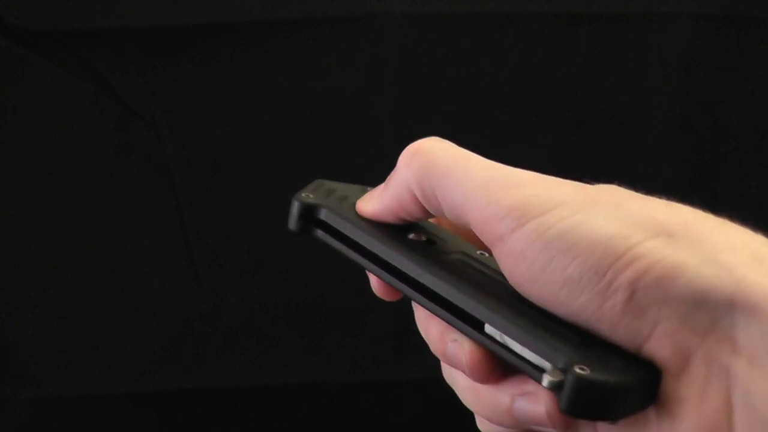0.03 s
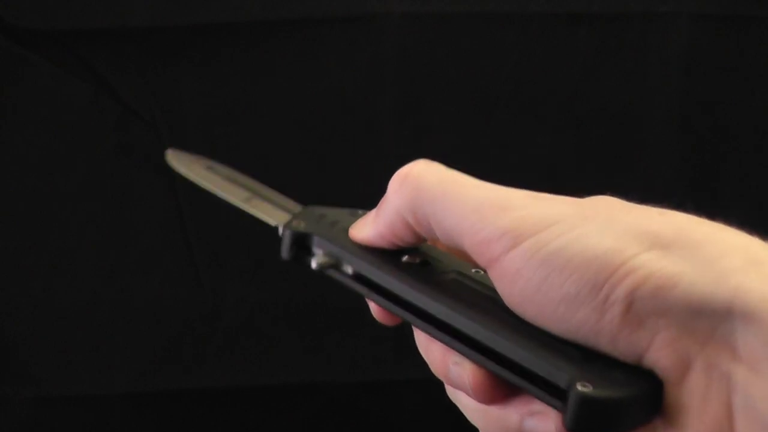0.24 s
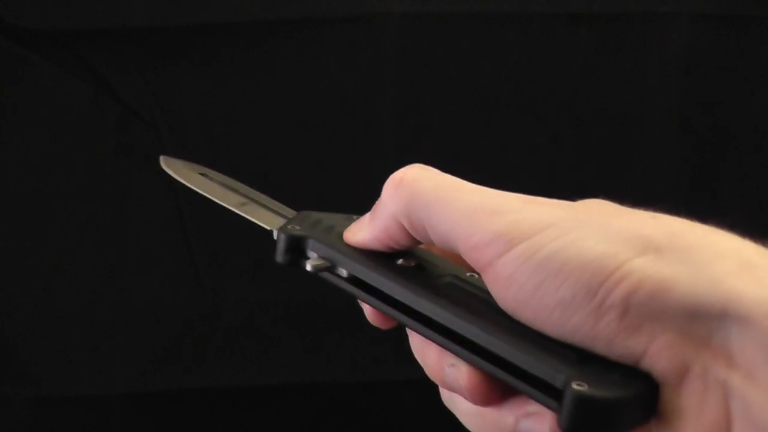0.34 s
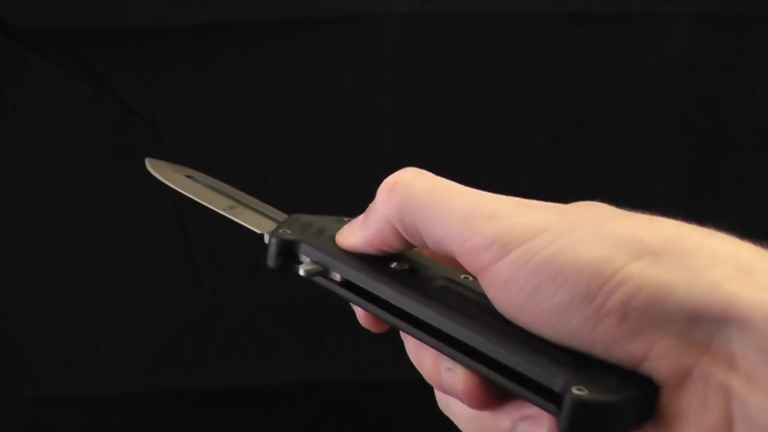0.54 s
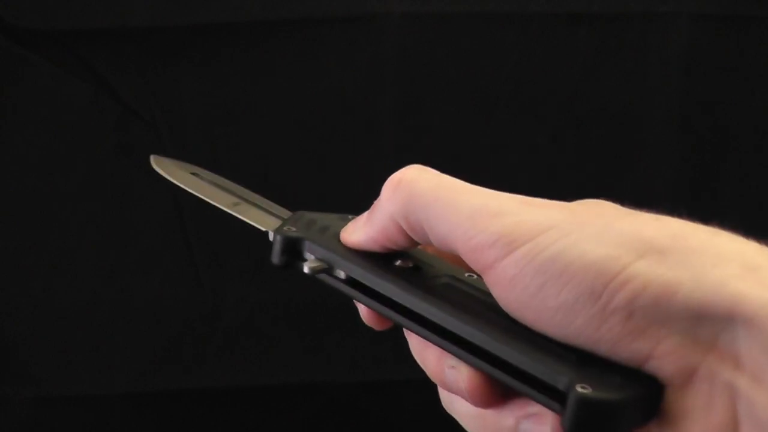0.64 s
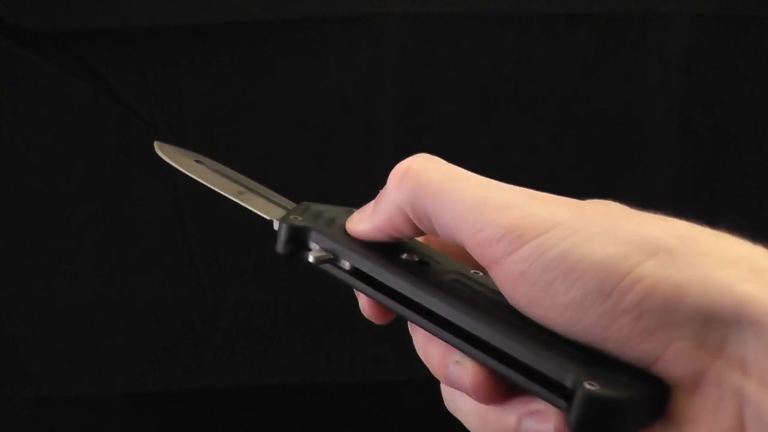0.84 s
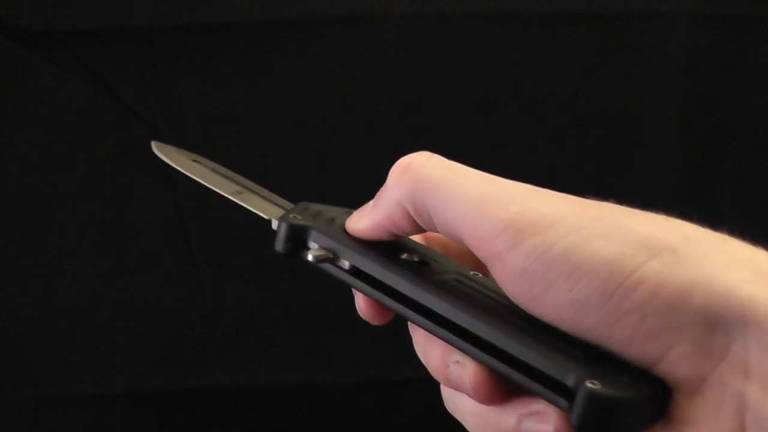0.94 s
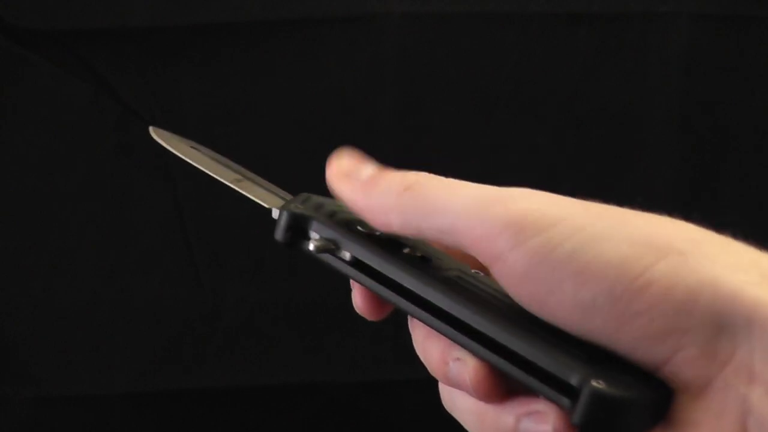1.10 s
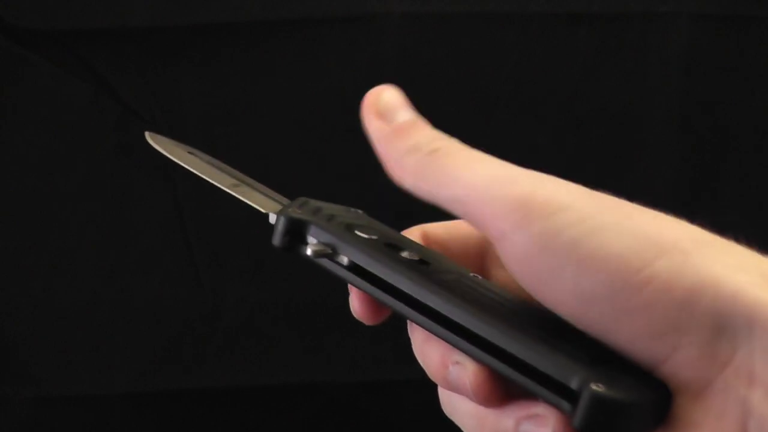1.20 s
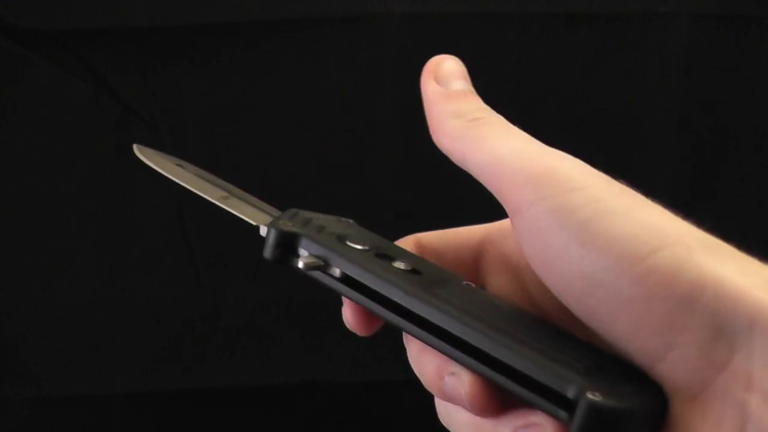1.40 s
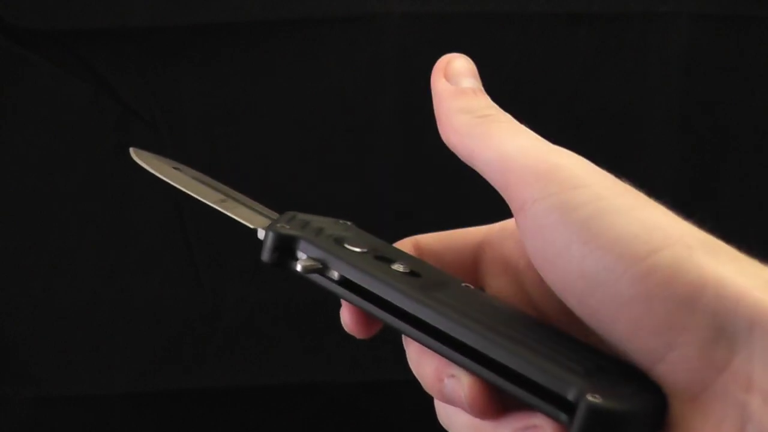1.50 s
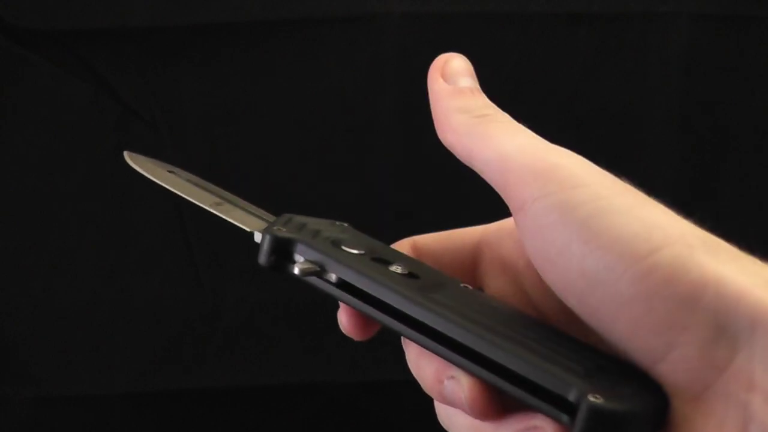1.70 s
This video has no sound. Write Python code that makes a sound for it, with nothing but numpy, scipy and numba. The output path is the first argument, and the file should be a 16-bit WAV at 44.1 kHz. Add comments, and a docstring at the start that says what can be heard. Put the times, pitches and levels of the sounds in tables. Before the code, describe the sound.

A spring-loaded knife blade snaps open with one sharp metallic clack and a brief ringing tail

```python
"""A spring-loaded knife fires close to a small two-port camera in a quiet, live room: the catch lets go,
the blade slides out and slams into its lock with a few bounces. Filtered noise bursts make the steel
chatter, decaying sines the blade's ring and the handle's thud, and decaying noise the room's answer.
The camera's gain control ducks and lets go; under it all lie room rumble, a wavering hum, microphone hiss,
the camera's faint ticking and small creaks of the grip."""
import sys
import numpy as np
from scipy import signal
from scipy.fft import rfft, irfft, next_fast_len
from scipy.io import wavfile
from scipy.ndimage import uniform_filter1d, map_coordinates
from numba import njit

SR = 44100
rng = np.random.default_rng(int(sys.argv[2]) if len(sys.argv) > 2 else 0)


def amplitude_ratio(level_db):
    """Convert a level in decibels to the matching linear amplitude (field) ratio."""
    exponent = np.asarray(level_db, float) / 20
    return 10 ** exponent


def to_wav(sig):
    """Store sig (one row per channel, or 1-D mono) as 16-bit WAV at the path in sys.argv[1].

    Samples outside -1..1 are clipped; the rate is SR.
    """
    pcm = np.clip(np.atleast_2d(sig), -1, 1) * 32767
    pcm = np.round(pcm).astype(np.int16)
    wavfile.write(sys.argv[1], SR, pcm.T)  # frames by channels


N = 77175  # samples, 1.75 s


def curve(rows):
    """(s, value) rows as one value per sample."""
    return np.interp(np.arange(N) / SR, *np.transpose(rows))


def along(points, hz):
    """(Hz, value) points interpolated on a log frequency axis."""
    point_hz, values = np.transpose(points)
    return np.interp(np.log(hz + 1), np.log(point_hz + 1), values)


def wobble(rate):
    """A smooth random curve with rate knots a second."""
    knots = rng.standard_normal(int(N * rate / SR) + 4)
    return map_coordinates(knots, [np.arange(N) * rate / SR])


def coloured(x, spectrum):
    """x through a causal, minimum-phase filter with the given (Hz, dB) shape and unit noise gain."""
    size = 2 * next_fast_len(N // 2 + 4096)
    shape = amplitude_ratio(along(spectrum, np.fft.rfftfreq(size, 1 / SR)))
    # folding the cepstrum onto positive time makes the filter causal
    cepstrum = irfft(np.log(shape + 1e-6), size)
    cepstrum[1:size // 2] *= 2
    cepstrum[size // 2 + 1:] = 0
    response = np.exp(rfft(cepstrum))
    noise_gain = np.sqrt(np.mean(abs(response) ** 2))
    return irfft(rfft(x, size) * response / noise_gain, size)[..., :N]


def widen(mid, other, side_share):
    """Left and right from a mid signal and an unrelated twin scaled by the (Hz, dB) side share."""
    side = irfft(rfft(other) * amplitude_ratio(along(side_share, np.fft.rfftfreq(N, 1 / SR))), N)
    return np.array([mid + side, mid - side])


def bursts(rows, t60):
    """Envelope of contacts: each jumps in, holds for its length, then dies."""
    t = np.arange(N) / SR
    return sum(amplitude_ratio(db - 60 * np.clip(t - start - hold, 0, 1) / t60) * (t >= start)
               for start, db, hold, *_ in rows)


def ringing(times, levels_db, modes):
    """Impulses at the given times ring a table of decaying sine modes."""
    blows = np.zeros(N)
    np.add.at(blows, (np.asarray(times) * SR).astype(int), amplitude_ratio(levels_db))
    t = np.arange(SR // 8) / SR
    ring = sum(amplitude_ratio(db - 60 * t / t60) * np.sin(2 * np.pi * hz * t) for hz, db, t60 in modes)
    return signal.fftconvolve(blows, ring)[:N]


# Room rumble and hiss, the part alike on both ports. Each row: frequency in Hz, relative density in dB per Hz.
AIR_MID_COLOUR = [(15, -76), (25, -42.5), (65, -5.5), (85, -6), (105, -14.5), (135, -14), (202, -9.5),
                  (232, -5), (266, -11.5), (445, -19.5), (496, -16), (669, -24.5), (726, -18), (1010, -35),
                  (1180, -26.5), (2090, -35.5), (3060, -32.5), (4480, -39), (6210, -32.5), (14400, -44),
                  (16500, -55.5)]
# The part opposed on the two ports. Each row: frequency in Hz, relative density in dB per Hz.
AIR_SIDE_COLOUR = [(15, -48), (25, -15), (114, 1), (410, -2), (809, -9), (1010, -20), (1150, -12.5),
                   (2270, -32.5), (3060, -29), (4600, -44.5), (5720, -32.5), (14400, -36.5), (16500, -45.5)]


def room_air():
    """Rumble and microphone hiss: two steady coloured noises whose levels drift slowly."""
    mid_db = -61.5 + 0.68 * wobble(4)
    side_db = -62 + 0.87 * wobble(4)
    mid = amplitude_ratio(mid_db) * coloured(rng.standard_normal(N), AIR_MID_COLOUR)
    side = amplitude_ratio(side_db) * coloured(rng.standard_normal(N), AIR_SIDE_COLOUR)
    return np.array([mid + side, mid - side])


# Hum tones. Each row: frequency in Hz, level in dB, waver of level in dB.
HUM_TONES = [(75, -66, 3), (139, -72, 2), (236.2, -71, 4), (721, -76, 0)]
# Swell of the lowest tone, used about its own mean. Each row: time in seconds, level in dB.
HUM_SWELL = [(0.5, -73), (0.802, -69), (0.812, -79), (1.042, -59.5), (1.75, -60.5)]


def hum():
    """Sines, most of them wavering in level and phase; the lowest also swells and sinks."""
    t = np.arange(N) / SR
    tones = []
    for hz, db, waver_db in HUM_TONES:
        level = amplitude_ratio(db + waver_db * wobble(9.8))
        phase_waver = .4 * waver_db * wobble(8)  # radians
        tones.append(level * np.sin(2 * np.pi * hz * t + phase_waver))
    swell_db = curve(HUM_SWELL)
    return amplitude_ratio(swell_db - swell_db.mean()) * tones[0] + sum(tones[1:])


# Ring of one tick. Each row: frequency in Hz, relative level in dB, t60 in seconds.
TICK_MODES = [(2600, -2, .028), (3080, 0, .028)]


def camera_ticks():
    """The camera's faint ticking: evenly spaced impulses of uneven strength ring two modes."""
    count, start_s, period_s = 104, .0015, .01668
    levels_db = -73 + 3 * rng.standard_normal(count)
    return ringing(start_s + period_s * np.arange(count), levels_db, TICK_MODES)


# Rubs of the grip. Each row: start in seconds, level in dB, length in seconds.
GRIP_RUBS = [(.016, -65, .003), (.085, -71, .004), (.75, -73, .02), (.775, -70, .01), (.808, -70, .015)]
# Their tone. Each row: frequency in Hz, relative density in dB per Hz.
CREAK_COLOUR = [(2000, -25), (4500, -8), (6000, 0), (8500, -3), (11000, -14), (14000, -25)]


def grip_creaks():
    """The grip rubs: short coloured noise bursts that die with a t60 of 0.05 s."""
    return coloured(bursts(GRIP_RUBS, .05) * rng.standard_normal(N), CREAK_COLOUR)


# Width of the knife heard close by. Each row: frequency in Hz, side over mid in dB.
NEAR_SIDE = [(1500, -9.5), (4000, -18.5), (8000, -15.5), (15000, -10)]


def close_noise(envelope, colour):
    """Steel noise close to the two ports: a shared part and an unrelated side part."""
    mid, twin = coloured(envelope * rng.standard_normal((2, N)), colour)
    return widen(mid, twin, NEAR_SIDE)


def chatter(contacts, colour):
    """Steel on steel: each contact is a rough noise burst with a short decay."""
    t60_s, rough_db, rough_rate = 0.0091, 4, 1500
    rough = amplitude_ratio(rough_db * wobble(rough_rate))
    return close_noise(rough * bursts(contacts, t60_s), colour)


# Handle modes. Each row: frequency in Hz, relative level in dB, t60 in seconds.
HANDLE_MODES = [(240, 3, .025), (330, -2, .015), (510, 2, .014), (660, 0, .013), (800, -3, .012),
                (1300, -7, .008)]


def handle_thud(contacts):
    """Every contact knocks the handle, whose low modes die within hundredths of a second."""
    times, _, _, thud_db = np.transpose(contacts)
    return ringing(times, thud_db, HANDLE_MODES)


# Contacts of the catch. Each row: start in seconds, level in dB, chatter length in seconds, thud in dB.
CATCH_CONTACTS = [(0.2141, -41, 0.0021, -70), (.2207, -37, .001, -71), (0.2217, -7, .002, -29),
                  (.2240, -8, .001, -23)]
# Their tone. Each row: frequency in Hz, relative density in dB per Hz.
CATCH_COLOUR = [(710, -45.5), (1200, -14.5), (2170, -23.5), (3970, -28.5), (4520, -17), (6150, 0.5),
                (7090, -5), (9130, -9), (11100, -22), (12500, -15), (13300, -25), (15800, -27),
                (16500, -42.5)]


def catch():
    """The catch lets go: steel chatter, with a thud alike on both ports."""
    return chatter(CATCH_CONTACTS, CATCH_COLOUR) + handle_thud(CATCH_CONTACTS)


# Blade travel and rattle. Each row: time in seconds, level in dB.
SLIDE_LEVEL = [(.2220, -14), (.2300, -14), (.2440, -10.5), (.2600, -18), (.2720, -34.5), (.2900, -48.5)]
# Its tone. Each row: frequency in Hz, relative density in dB per Hz.
SLIDE_COLOUR = [(590, -56.5), (1000, -24), (2170, -26.5), (3550, -9.5), (3900, -6.5), (4440, -21.5),
                (4870, -2), (7520, -3.5), (12500, -16), (15900, -29), (16500, -48)]


def blade_slide():
    """The blade slides out and rattles: noise following the level curve, not driven outside it."""
    t = np.arange(N) / SR
    moving = (t > SLIDE_LEVEL[0][0]) & (t < SLIDE_LEVEL[-1][0])
    return close_noise(amplitude_ratio(curve(SLIDE_LEVEL)) * moving, SLIDE_COLOUR)


# Sideways jerks of the knife. Each row: time in seconds, level in dB.
JERKS = [(0.2223, -27), (0.2477, -14), (.2484, -1), (.2506, -11), (.2528, -7)]
# Their ring. Each row: frequency in Hz, relative level in dB, t60 in seconds.
JERK_MODES = [(470, 0.5, .013), (1200, -6, .009), (680, -5, .01)]


def sideways_jerks():
    """The knife jerks sideways: short low rings, opposed on the two ports."""
    jerk = ringing(*np.transpose(JERKS), JERK_MODES)
    return np.array([-jerk, jerk])


# Recoil alike on both ports. Each row: frequency in Hz, level in dB, t60 in seconds.
RECOIL_MID = [(68, -10, .04)]
# Recoil opposed on the ports. Each row: lag in seconds, frequency in Hz, level in dB, t60 in seconds.
RECOIL_SIDE = [(.0022, 80, -5, .03), (-.028, 110, -28, .03)]


def hand_recoil():
    """The hand recoils: deep decaying sines, one shared and the others opposed on the two ports."""
    recoil_s = .2505
    mid = ringing([recoil_s], [0], RECOIL_MID)
    side = sum(ringing([recoil_s + lag], [0], [mode]) for lag, *mode in RECOIL_SIDE)
    return np.array([mid - side, mid + side])


# Energy sent into the room by catch, slide and lock. Each row: time in seconds, relative level in dB.
ROOM_SHOTS = [(.2225, -8), (.235, -14), (.250, 0)]
# Tone of the tail at its reference age. Each row: frequency in Hz, relative density in dB per Hz.
ROOM_COLOUR = [(210, -54), (350, -24), (656, -21), (723, -35), (809, -18), (1190, -29), (1400, -16),
               (1840, -23), (2130, -32), (2270, -25), (2760, -15), (3510, -15), (3870, 2), (4470, -15),
               (5170, 1), (6170, -11), (7730, -5), (8940, -11), (9540, -17), (15500, -41), (16500, -60)]
# Decay of the room. Each row: frequency in Hz, t60 in seconds.
ROOM_T60 = [(500, .35), (1300, .55), (2500, .6), (4000, .58), (6000, .5), (9000, .44), (15000, .33)]
# Width of the tail. Each row: frequency in Hz, side over mid in dB.
ROOM_SIDE = [(60, 2), (150, 6), (380, 8.5), (950, -0.5), (2380, -9.5), (5980, -13.5), (15000, 1)]


def room():
    """Reverberation of each burst: noise builds up, then every frequency dies at its own speed."""
    room_db, reference_age_s, delay_s, build_s = -34, .1, .006, .02
    wet = np.zeros((2, N + SR))
    for start, db in ROOM_SHOTS:
        hz, t, cells = signal.stft(rng.standard_normal((2, SR)), SR, nperseg=256)
        build = 1 - np.exp(-t / build_s)
        decay = amplitude_ratio(-60 * (t - reference_age_s) / along(ROOM_T60, hz)[:, None])
        tail = signal.istft(cells * build * decay, SR, nperseg=256)[1][:, :SR]
        first = int((start + delay_s) * SR)
        wet[:, first:first + SR] += amplitude_ratio(db) * tail
    mid, twin = coloured(wet[:, :N], ROOM_COLOUR)
    return amplitude_ratio(room_db) * widen(mid, twin, ROOM_SIDE)


# Slam and bounces. Each row: start in seconds, level in dB, chatter length in seconds, thud in dB.
LOCK_CONTACTS = [(0.2468, -3, .0015, -12.5), (0.2489, -4, .002, -21), (0.2513, -3, .001, -26),
                 (.2538, -10, .001, -30), (0.2557, -8, .0015, -40), (0.2608, -18, .003, -45)]
# Their tone. Each row: frequency in Hz, relative density in dB per Hz.
LOCK_COLOUR = [(710, -49), (1200, -22), (2190, -18.5), (3260, -7.5), (3520, -25.5), (3970, 4),
               (4570, -17.5), (5160, 0.5), (8450, 1), (10200, -4), (11100, -7), (15300, -13.5),
               (16500, -31)]
# Blade modes. Each row: frequency in Hz, level in dB when the loudest contact rings it, t60 in seconds.
BLADE_MODES = [(3970, -13.5, .05), (5200, -16.5, .04), (6394, -15, .03), (7656, -18, .025)]


def lock():
    """The blade slams into its lock and bounces: steel chatter, ringing blade and handle thud."""
    times, levels_db, _, _ = np.transpose(LOCK_CONTACTS)
    blade = ringing(times, levels_db - levels_db.max(), BLADE_MODES)
    return chatter(LOCK_CONTACTS, LOCK_COLOUR) + blade + handle_thud(LOCK_CONTACTS)


def scene():
    """The background, the knife and its room at the two ports."""
    background = room_air() + hum() + camera_ticks() + grip_creaks()
    knife = catch() + blade_slide() + sideways_jerks() + hand_recoil() + lock()
    return background + knife + room()


@njit
def follow(want_db, attack, hold, release_db, slow):
    """Gain cut in dB: chases the demand, holds, lets go evenly; a slower memory trails it."""
    fast, memory = np.zeros_like(want_db), np.zeros_like(want_db)
    cut, trail, wait = 0., 0., 0.
    for i in range(len(want_db)):
        if want_db[i] > cut:
            cut += attack * (want_db[i] - cut)
            wait = hold
        elif wait > 0:
            wait -= 1
        else:
            cut = max(cut - release_db, 0.)
        trail = max(cut, trail * slow)
        fast[i], memory[i] = cut, trail
    return fast, memory


def gain_control(dry):
    """The camera turns both ports down together after loud peaks, then lets go."""
    limit_db, most_cut_db, squeeze = -28, 13, .9  # squeeze: dB of cut per dB over the limit
    attack_s, hold_s, release_db_per_s = .004, .035, 260
    slow_share, slow_release_s = .3, .2
    power = uniform_filter1d(np.mean(dry ** 2, axis=0), size=44)  # about 1 ms
    level_db = 10 * np.log10(abs(power) + 1e-12)
    want_db = np.clip(squeeze * (level_db - limit_db), 0, most_cut_db)
    fast, memory = follow(want_db, 1 / (attack_s * SR), hold_s * SR, release_db_per_s / SR,
                          np.exp(-1 / (slow_release_s * SR)))
    return dry * amplitude_ratio(-(1 - slow_share) * fast - slow_share * memory)


def overload(ports):
    """The part alike on both ports rounds off smoothly near its ceiling."""
    ceiling, knee = .47, 4
    left, right = ports
    mid, side = (left + right) / 2, (left - right) / 2
    mid = mid / (1 + abs(mid / ceiling) ** knee) ** (1 / knee)
    return np.array([mid + side, mid - side])


# Dips of the camera body. Each row: frequency in Hz, width in Hz, depth in dB.
BODY_DIPS = [(2200, 130, -7), (4480, 170, -4)]


def microphone_band(ports):
    """The deepest bass and the top are trimmed, with dips from the camera body."""
    low_cut_hz, top_hz, top_edge_hz = 35, 16500, 400
    hz = np.fft.rfftfreq(N, 1 / SR)
    bass = (1j * hz / (low_cut_hz + 1j * hz)) ** 2
    treble = np.clip((top_hz - hz) / top_edge_hz + .5, 0, 1) ** 2
    dips_db = sum(db * np.exp(-((hz - dip_hz) / width) ** 2) for dip_hz, width, db in BODY_DIPS)
    return irfft(rfft(ports) * bass * treble * amplitude_ratio(dips_db), N)


def roll_off(x):
    """The treble ends steeply here."""
    return signal.sosfilt(signal.butter(12, 16720, fs=SR, output="sos"), x)


def record(dry):
    """The camera's chain: gain control, overload, then the trimmed and dipped band."""
    steadied = gain_control(dry)
    rounded = overload(steadied)
    mix = microphone_band(rounded)
    return roll_off(mix)


dry = scene()
out = record(dry)
to_wav(out)
```